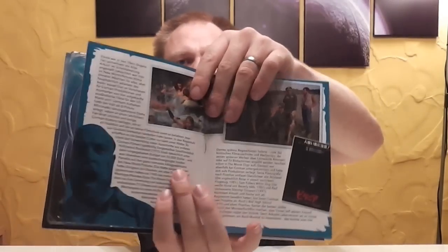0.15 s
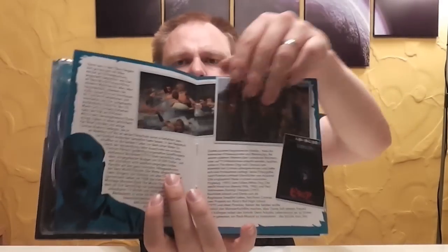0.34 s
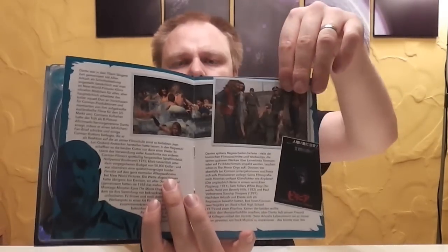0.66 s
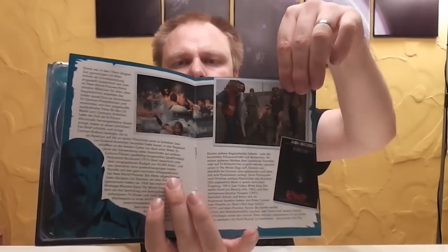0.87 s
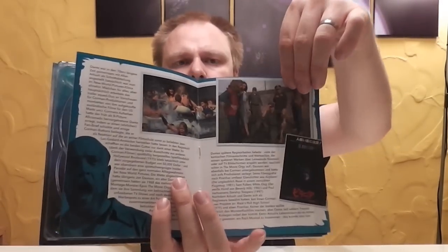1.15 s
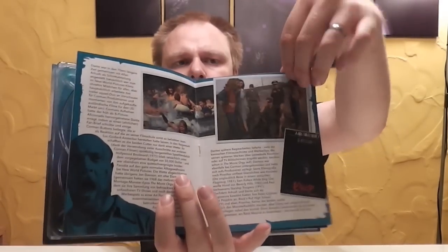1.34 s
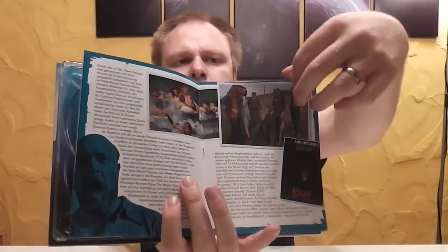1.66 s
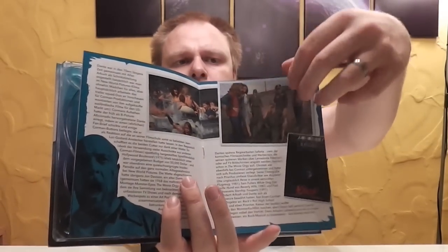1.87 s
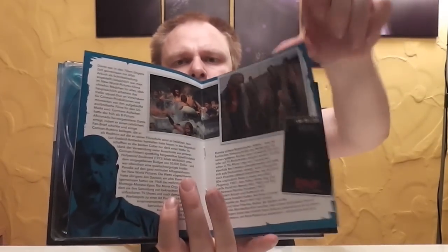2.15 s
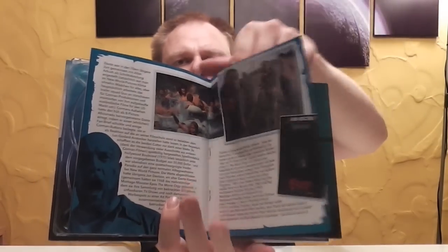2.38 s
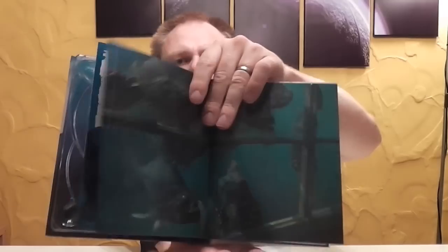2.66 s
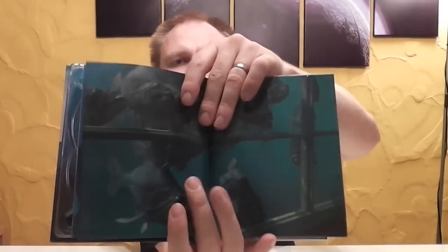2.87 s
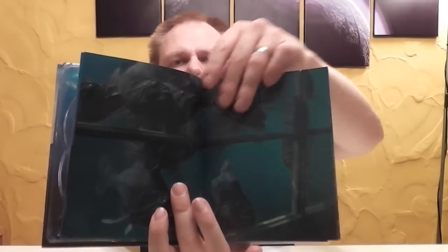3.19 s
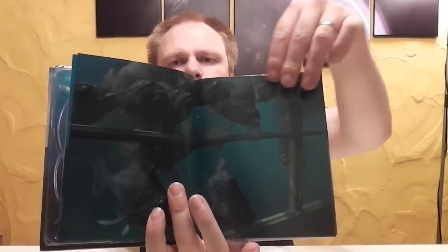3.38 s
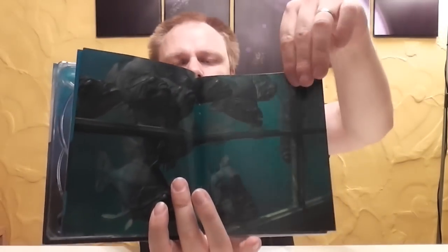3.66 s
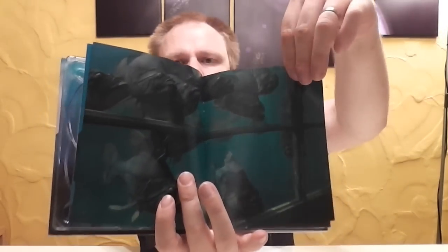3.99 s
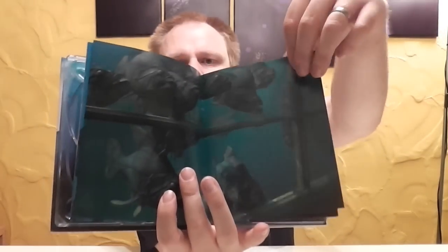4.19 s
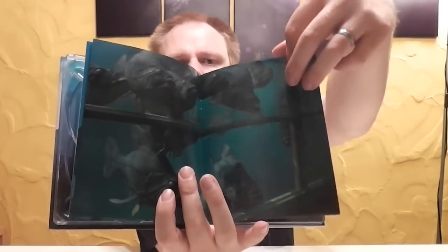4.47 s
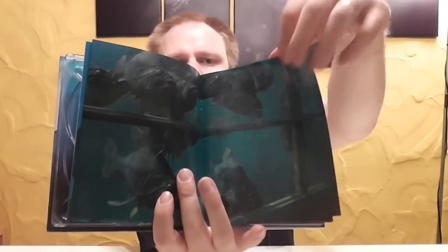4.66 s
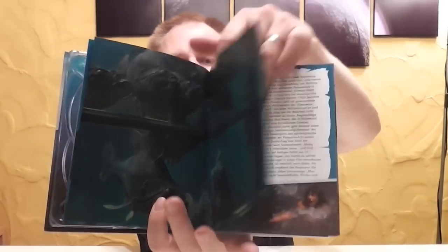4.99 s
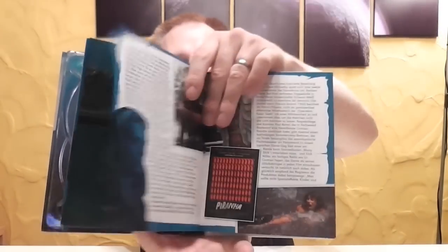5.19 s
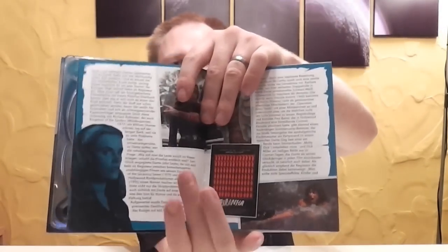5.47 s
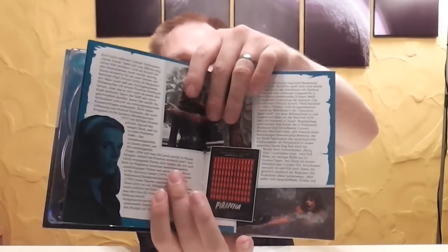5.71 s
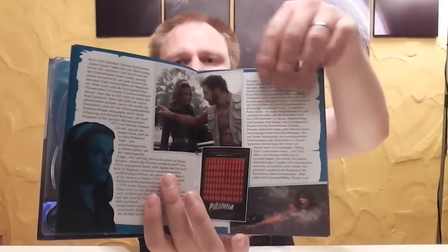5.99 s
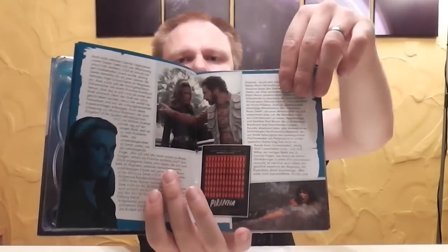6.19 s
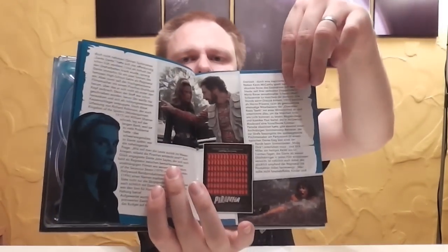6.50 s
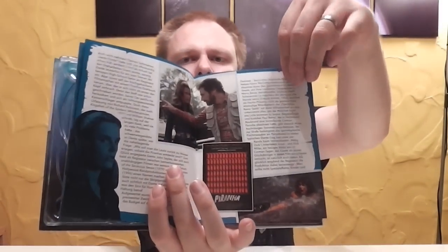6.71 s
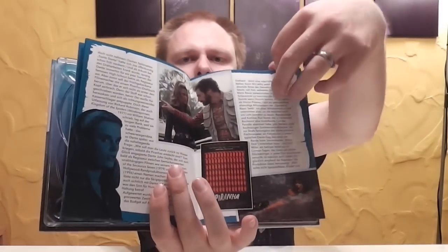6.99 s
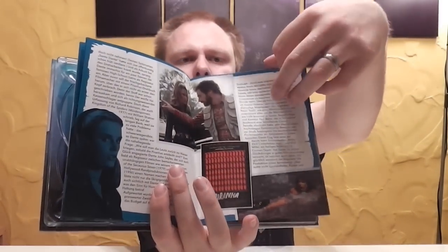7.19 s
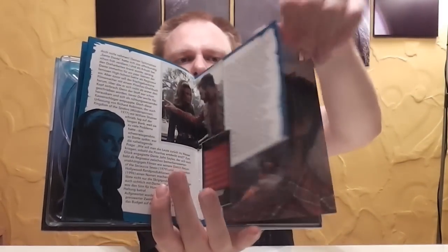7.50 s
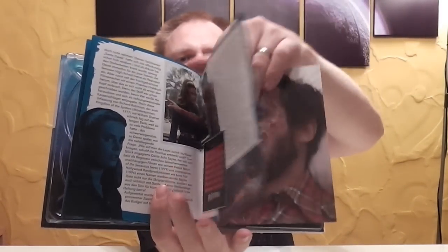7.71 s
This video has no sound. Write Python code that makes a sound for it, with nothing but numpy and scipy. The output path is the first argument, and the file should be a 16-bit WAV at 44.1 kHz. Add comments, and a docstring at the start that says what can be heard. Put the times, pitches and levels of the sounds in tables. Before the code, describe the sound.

Someone thumbs and turns heavy book pages right by the microphone. Edges slip off the fingertip with crisp little cracks, sheets flex and buckle with soft knocks, and whole pages swing over with a low, faint flutter. Activity comes in bursts with near-quiet between them, the strongest crack arriving late. The small room adds a short, faint tail, with gentle hiss and a low electrical hum throughout.

```python
"""Stiff glossy pages of a thick book are thumbed and turned close to a small stereo microphone.
A few light snaps come first, then short slides of finger and sheet and a run of sharp snaps near 1.4 s.
A page sweeps over from 2 s, with dull knocks and a faint creak; quiet rubbing and a second creak follow.
A quick run of snaps comes at 4.3 s as another page sweeps, one more sweeps at 5 s, and the hardest snap
comes near 7 s among knocks. A small quiet room, hiss and mains hum lie under all of it."""
import sys
import numpy as np
from scipy import signal
from scipy.fft import rfft, irfft
from scipy.io import wavfile
from scipy.ndimage import uniform_filter1d

SR = 44100
rng = np.random.default_rng(int(sys.argv[2]) if len(sys.argv) > 2 else 0)


def volts_from_db(level):
    """Convert decibel levels to linear amplitude ratios."""
    exponent = np.asarray(level, float) / 20
    return 10 ** exponent


def wav_out(sig):
    """Save sig, one row per channel (or a flat mono array), as 16-bit PCM at SR to the path in sys.argv[1]."""
    wavfile.write(sys.argv[1], SR, np.round(np.clip(np.atleast_2d(sig).T, -1, 1) * 32767).astype(np.int16))


N = 346185  # length of the scene in samples

# Levels of sheet, scrape and crack sounds are those before they are placed left or right. Page edges letting
# go, plus a few small buckles near 0.27, 0.42 and 3.17 s that pop with a crack: (time [s], crack peak [dB],
# thump rms over 3 ms [dB], pitch of the freed flap [Hz])
EDGE_SNAPS = [(0.1087, -39.5, -57, 1110), (0.265, -47, -47.5, 910), (0.3181, -39, -44.5, 1000),
              (0.4199, -49, -45.5, 1280), (1.098, -26, -37, 1700), (1.407, -18, -31.5, 1770),
              (1.4349, -21.5, -33, 1370), (1.4617, -25, -39, 1480), (1.48, -36, -45, 1970),
              (1.4993, -29.5, -48, 2100), (1.7946, -29.5, -44, 1380), (1.945, -26.5, -52, 3900),
              (1.955, -18, -35.5, 3400), (2.4985, -34.5, -49, 1570), (2.66, -41, -44.5, 1620),
              (2.9715, -47, -48, 1000), (3.169, -53, -48, 1560), (4.2518, -27.5, -37.5, 1340),
              (4.2591, -19, -39, 1870), (4.2817, -22.5, -48, 1560), (4.3009, -31.5, -36.5, 1380),
              (4.3214, -23, -42.5, 1350), (4.3418, -25.5, -39, 1820), (4.3633, -25.5, -39.5, 1820),
              (4.777, -30, -32.5, 1410), (5.1111, -33, -48.5, 970), (5.7228, -35.5, -44.5, 1490),
              (6.775, -23.5, -37.5, 940), (6.9667, -17, -26.5, 1900), (7.052, -40, -41, 1400),
              (7.0941, -21.5, -37, 1420), (7.205, -31, -39.5, 1880), (7.4299, -34, -43.5, 980),
              (7.8162, -36, -45.5, 1450)]
# Dull knocks of a buckling sheet: (time [s], rms over 3 ms [dB])
BUCKLE_KNOCKS = [(0.329, -56), (0.974, -54.5), (2.137, -49), (2.521, -46), (2.532, -42), (2.677, -40),
                 (2.701, -51), (2.7285, -44), (2.7342, -35.5), (3.083, -52.5), (3.23, -51.5), (5.259, -55),
                 (5.3546, -41), (5.408, -52.5), (5.8435, -50.5), (6.165, -50), (6.599, -46), (6.973, -36),
                 (6.9765, -33.5), (6.9885, -29)]
# Colour of the flexing sheet: (frequency [Hz], relative level [dB])
SHEET_COLOUR = [(100, -34), (500, -6), (950, 1), (1400, 6), (2000, 0.5), (2900, -10.5), (5000, -30)]
# Colour of scrapes and cracks as the microphone picks them up: (frequency [Hz], relative level [dB])
SCRAPE_COLOUR = [(1100, -29.5), (2200, 0.5), (3150, -4.5), (3800, 0), (4800, 0.5), (5800, -1.5),
                 (6900, 0.5), (9800, -4.5), (14000, -9.5), (16500, -31)]
# Colour of a whole page wobbling: (frequency [Hz], relative level [dB])
WOBBLE_COLOUR = [(50, -25), (300, -11), (1200, -36.5)]
# The sheet's resonance, which moves with its bend: (time [s], frequency [Hz])
SHEET_RESONANCE = [(1.3, 1390), (2.55, 1010), (2.72, 1440), (3.82, 1160), (4.2, 1550), (5.17, 820),
                   (5.35, 1160), (7.0, 1300)]


def evened(x):
    """Scales a sound to rms 1."""
    return x / np.sqrt(np.mean(x ** 2) + 1e-20)


def read(points, hz):
    """Reads a table of values on a log-frequency axis."""
    f, value = np.transpose(points)
    return np.interp(np.log(hz + 1), np.log(f + 1), value)


def curve(points):
    """Draws a table of (time, value) as one value per sample."""
    return np.interp(np.arange(N) / SR, *np.transpose(points))


def ring(points):
    """The answer to a single tap: energy 1, the given colour, and as prompt as that colour allows."""
    level_db = np.maximum(read(points, abs(np.fft.fftfreq(4096, 1 / SR))), -70)
    # the Hilbert transform finds the phase that lets nothing sound before the tap
    spectrum = np.exp(np.conj(signal.hilbert(np.log(volts_from_db(level_db)))))
    taps = np.fft.ifft(spectrum).real[:1024]
    return taps / np.linalg.norm(taps)


def add(mix, s, sound):
    """Mixes a sound in at time s, in seconds."""
    part = mix[round(s * SR):][:len(sound)]
    part += sound[:len(part)]


def fading_power(start, end, first_db, last_db, db_per_s):
    """Power that starts at once, glides from first to last level and then dies away."""
    t = np.arange(round((end - start + .3) * SR)) / SR
    glide_db = np.interp(t, [0, end - start], [first_db, last_db])
    fall_db = db_per_s * np.maximum(t - end + start, 0)
    return volts_from_db(glide_db - fall_db) ** 2


def slips(per_s, spread_db, smooth):
    """Stick-slip friction: tiny releases of uneven size over a smooth rub."""
    happens = rng.random(N) < per_s / SR
    size = volts_from_db(spread_db * np.minimum(rng.exponential(1, N), 5)) * happens
    return evened(size * rng.standard_normal(N)) + smooth * rng.standard_normal(N)


def patchy(x, patchy_db):
    """The colour wanders in patches of time and pitch as the sheet bends and the grip shifts."""
    z = signal.stft(x, nperseg=256)[2]
    patches = rng.standard_normal(z.shape[::-1])
    patches = uniform_filter1d(patches, size=24, axis=0)  # over time
    patches = uniform_filter1d(patches, size=3, axis=1)  # over frequency
    return signal.istft(z * volts_from_db(patchy_db * evened(patches).T), nperseg=256)[1][:N]


def resonate(x, hz, width_hz):
    """A resonance of gain 1 that follows the curve hz."""
    turn = np.exp(2j * np.pi * np.cumsum(hz) / SR)
    r = np.exp(-np.pi * width_hz / SR)
    # shift the moving pitch to zero, smooth, shift back
    return 2 * (turn * signal.lfilter([1 - r], [1, -r], x / turn)).real


def background():
    """Unrelated hiss in each microphone capsule and a mains hum shared by both."""
    # Hiss colour: (frequency [Hz], relative level [dB])
    hiss_colour = [(30, -22), (60, -8.5), (190, -4.5), (700, -5), (1300, -3.5), (2600, -12.5),
                   (5300, -11.5), (16000, -14.5)]
    # Mains hum: (frequency [Hz], rms level [dB])
    hum_tones = [(50, -87), (100, -92.5)]
    hiss_db = -63  # rms
    colour = volts_from_db(read(hiss_colour, np.fft.rfftfreq(N, 1 / SR)))
    hiss = irfft(rfft(rng.standard_normal((2, N))) * colour, N)
    t = np.arange(N) / SR
    hum = sum(np.sqrt(2) * volts_from_db(db) * np.sin(2 * np.pi * f * t) for f, db in hum_tones)
    return volts_from_db(hiss_db) * evened(hiss) + hum


def creaks():
    """The binding creaks faintly: thin gliding tones that swell and fade."""
    # Creaks: (start [s], end [s], first pitch [Hz], last pitch [Hz], peak level [dB])
    glides = [(2.43, 2.612, 273, 323, -66.5), (3.474, 3.675, 676, 648, -68.5)]
    out = np.zeros(N)
    for start, end, first_hz, last_hz, db in glides:
        hz = np.linspace(first_hz, last_hz, round((end - start) * SR))
        tone = np.sin(2 * np.pi * np.cumsum(hz) / SR)
        add(out, start, volts_from_db(db) * np.hanning(len(hz)) * tone)
    return out


def sweeps():
    """A whole page sweeps through the air and wobbles: low lumpy noise that swells and fades."""
    # Sweeps: (start [s], end [s], level at the middle [dB])
    swings = [(2.047, 2.9, -70.5), (3.962, 4.626, -69.5), (5.004, 5.488, -68.5)]
    gain = np.zeros(N)
    for start, end, db in swings:
        first, last = round(start * SR), round(end * SR)
        gain[first:last] = volts_from_db(db) * np.hanning(last - first)
    lumps = slips(530, spread_db=6.5, smooth=0.51)
    return gain * evened(signal.oaconvolve(lumps, ring(WOBBLE_COLOUR))[:N])


def flexes(per_s, spread_db, cycles):
    """The sheet buckles in soft-edged wavelets of a few cycles, each patch at its own pitch."""
    out, pitches = np.zeros(N), np.geomspace(250, 2800, 24)
    patch = rng.integers(0, len(pitches), N)
    happens = rng.random(N) < per_s / SR
    size = volts_from_db(spread_db * np.minimum(rng.exponential(1, N), 4)) * happens
    for k, hz in enumerate(pitches):
        t = np.arange(0, cycles / hz, 1 / SR)
        wavelet = np.sin(np.pi * t / t[-1]) ** 2 * np.sin(2 * np.pi * hz * t)
        out += volts_from_db(read(SHEET_COLOUR, hz)) * signal.oaconvolve(size * (patch == k), wavelet)[:N]
    return evened(out)


def stroke_gain():
    """Gains of flex and scrape: hold, slides and settling after snaps and knocks add in power."""
    # Slides of finger or sheet: (start [s], end [s], scrape level at the middle [dB],
    # sheet flex level at the middle [dB], swell from start to end [dB])
    strokes = [(0.72, 0.736, -64, -71, 3), (0.957, 1.015, -57.5, -63, 14), (1.195, 1.227, -46, -55, 16),
               (1.215, 1.263, -41, -54.5, -6), (1.298, 1.329, -40.5, -49, -16),
               (1.333, 1.372, -45.5, -49, -8), (1.44, 1.528, -56, -56, -3), (1.611, 1.616, -45.5, -53, -18),
               (1.658, 1.667, -53.5, -59, 8), (1.733, 1.732, -45, -56, -5), (1.807, 1.833, -50, -64, -8),
               (1.937, 1.944, -50, -62, 16), (2.123, 2.142, -52.5, -53, 16.5),
               (2.14, 2.315, -59.5, -67.5, -2), (2.516, 2.567, -56.5, -50.5, 1),
               (2.665, 2.765, -56, -48.5, -1), (2.98, 3.02, -57.5, -61.5, -12),
               (3.145, 3.225, -66.5, -62, -10), (3.22, 3.366, -59.5, -72, 2),
               (3.498, 3.609, -67.5, -73, 11), (3.789, 3.855, -58.5, -56.5, 8.5),
               (3.95, 3.967, -43.5, -48, -5), (3.991, 4.023, -49, -54.5, -19),
               (4.033, 4.21, -53.5, -54.5, -10), (4.131, 4.2, -52.5, -49.5, 7),
               (4.236, 4.418, -59.5, -54, -23), (4.407, 4.502, -64.5, -55, -39),
               (4.543, 4.591, -54.5, -53, -27.5), (4.771, 4.817, -49.5, -65, 5),
               (5.011, 5.009, -46.5, -79, 10.5), (5.11, 5.199, -58, -56.5, 10.5),
               (5.19, 5.339, -56, -62, 2), (5.309, 5.324, -49.5, -51.5, -8), (5.341, 5.365, -59, -48.5, -4),
               (5.738, 5.966, -63.5, -71, 0), (6.068, 6.193, -68, -88, 10), (6.207, 6.254, -53.5, -60, -4),
               (6.357, 6.473, -62.5, -71, 9), (6.473, 6.566, -62.5, -63, -17),
               (6.565, 6.596, -58.5, -61, 20), (6.604, 6.758, -43.5, -56, 0), (6.75, 6.857, -57, -54.5, 0),
               (6.958, 6.954, -47, -44, 16), (7.061, 7.098, -49, -51, -23), (7.087, 7.182, -55, -53.5, -24),
               (7.169, 7.219, -47.5, -55, 15.5), (7.444, 7.498, -49, -52, -8), (7.631, 7.628, -60, -67, 34)]
    # The book shifts faintly in the hands throughout: (time [s], scrape level [dB], sheet flex level [dB])
    hold = [(0.0, -74.5, -64), (0.96, -85, -77.5), (1.73, -67.5, -70.5), (2.5, -88, -81),
            (2.59, -64.5, -62), (3.5, -85, -75.5), (3.85, -65, -66), (4.24, -61.5, -81), (4.61, -67.5, -74),
            (5.71, -74, -63), (5.97, -77, -90), (6.47, -71, -78), (6.93, -67, -55.5), (7.06, -59, -70),
            (7.26, -66.5, -68.5), (7.85, -86, -84)]
    flex_swell = 0.34  # share of the swell that the sheet follows
    scrape_stop, flex_stop = 1502, 456  # fall after the finger stops, dB per s
    settle_db, settle_fall = -14, 281  # flexing on after a thump: level against it, fall in dB per s
    s, *held = np.transpose(hold)
    scrape, flex = (volts_from_db(np.interp(np.arange(N) / SR, s, db)) ** 2 for db in held)
    for start, end, scrape_db, flex_db, swell in strokes:
        half = swell / 2
        add(scrape, start, fading_power(start, end, scrape_db - half, scrape_db + half, scrape_stop))
        half = flex_swell * swell / 2
        add(flex, start, fading_power(start, end, flex_db - half, flex_db + half, flex_stop))
    thumps = [(s, db) for s, _, db, _ in EDGE_SNAPS] + BUCKLE_KNOCKS
    for s, thump_db in thumps:
        first_db = thump_db + settle_db
        add(flex, s, fading_power(s, s, first_db, first_db, settle_fall))
    return uniform_filter1d(np.sqrt([flex, scrape]), size=120, axis=1)


def slides():
    """Dense slips make the scrape, while the sheet rubs smoothly and buckles in small wavelets."""
    # Level of the scrape's top treble: (time [s], lift [dB])
    treble_lift = [(.4, 10), (1.25, -9.5), (1.9, -2.5), (3.3, -1), (3.6, 5), (4.1, -3), (5.2, -2),
                   (5.93, 3), (6.23, -17), (6.65, -12.5), (6.83, 6), (7.1, -12), (7.5, -6)]
    rub_width_hz, rub_db = 570, 1.5  # a rubbed sheet favours one resonance
    catches = 0.1 * slips(48, spread_db=1.5, smooth=0)  # page edges catching
    grip = evened(slips(5000, spread_db=2.0, smooth=1.0)) + catches
    scrape = signal.oaconvolve(grip, ring(SCRAPE_COLOUR))[:N]
    scrape = evened(patchy(scrape, patchy_db=3.6))
    top = signal.sosfiltfilt(signal.butter(2, 7500, "high", fs=SR, output="sos"), scrape)
    scrape = scrape + top * (volts_from_db(curve(treble_lift)) - 1)
    rub = signal.oaconvolve(rng.standard_normal(N), ring(SHEET_COLOUR))[:N]
    flex = 0.5 * patchy(rub, patchy_db=7.5) + flexes(1500, spread_db=2.5, cycles=7.36)
    flex = flex + volts_from_db(rub_db) * resonate(flex, curve(SHEET_RESONANCE), rub_width_hz)
    return stroke_gain() * np.array([evened(flex), scrape])


def knocks():
    """A buckle pops through the sheet: a few cycles that swell fast and ring out, with an overtone."""
    pitch_spread = 0.086  # scatter about the sheet's resonance, as a share of the pitch
    knock_ms = 0.7  # time constant of swell and decay
    out, ms = np.zeros(N), np.arange(800) / SR * 1000
    shape = (ms / knock_ms) ** 2 * np.exp(-ms / knock_ms)
    draws = rng.standard_normal((len(BUCKLE_KNOCKS), 2))
    for (s, db), (detune, phase) in zip(BUCKLE_KNOCKS, draws):
        hz = np.interp(s, *np.transpose(SHEET_RESONANCE)) * np.exp(pitch_spread * detune)
        cycles = hz * ms / 1000
        overtone = 0.3 * np.sin(3.1 * np.pi * cycles - phase)
        pop = shape * (np.sin(2 * np.pi * cycles + phase) + overtone)
        add(out, s - knock_ms / 1000, volts_from_db(db) * pop / np.std(pop[40:180]))
    return out


def snaps():
    """A burst swells as the edge bends, cracks, rings the freed flap and rattles to a stop."""
    # Light ticks of a nail or corner catching: (time [s], crack peak [dB])
    light_ticks = [(0.4723, -44.5), (1.06, -36), (1.0758, -41), (1.5177, -35), (1.525, -44), (1.5451, -34),
                   (1.651, -33), (1.7459, -35), (1.838, -36.5), (2.61, -38.5), (2.749, -34.5), (2.938, -38),
                   (3.05, -37.5), (4.021, -40), (4.6, -39), (4.768, -37), (5.1537, -37.5), (5.34, -32.5),
                   (5.362, -42), (5.699, -39.5), (5.734, -37.5), (5.7871, -34), (6.618, -36), (6.6313, -36),
                   (6.902, -43), (6.9117, -47), (6.923, -39.5), (6.934, -43), (7.016, -35), (7.1113, -38),
                   (7.1295, -30), (7.1416, -41), (7.176, -28), (7.3444, -46)]
    tick_thump_db, tick_hz = -17, 1760  # a tick's thump against its crack, and its flap pitch
    thud, crack_top_hz = 0.078, 10500  # share of low body under a thump; cracks dull above this
    lead = 400  # samples of bending kept ahead of each snap's time
    ms = np.arange(-lead, 1200) / SR * 1000 - .8
    out = np.zeros((2, N + 3000))
    rows = EDGE_SNAPS + [(s, db, db + tick_thump_db, tick_hz) for s, db in light_ticks]
    bursts = rng.standard_normal((len(rows), len(ms)))
    t = np.arange(1026) / SR
    low_body = signal.lfilter(*signal.butter(2, 120, "high", fs=SR), ring(WOBBLE_COLOUR))
    body = ring(SHEET_COLOUR) + thud * low_body
    crack_ring = ring(SCRAPE_COLOUR)
    dulling = signal.butter(1, crack_top_hz, fs=SR)
    for (s, crack_db, thump_db, hz), burst in zip(rows, bursts):
        swell_ms = 0.14 + 4.5 * volts_from_db(crack_db)  # a stronger edge bends longer
        rise = np.exp(-abs(ms) / swell_ms) + 0.16 * np.exp(-abs(ms) / 1.6)
        fall = np.exp(-abs(ms) / 0.64) + 0.2 * np.exp(-abs(ms) / 5.6)
        burst = np.where(ms < 0, rise, fall) * burst
        flap = t * np.exp(-np.pi * 600 * t) * np.sin(2 * np.pi * hz * t)
        flap = np.diff(flap, 2)  # a small flap sends out little bass
        thump = np.convolve(burst, body + 1.44 * flap / np.linalg.norm(flap))
        crack = signal.lfilter(*dulling, np.convolve(burst, crack_ring))
        add(out[0], s, volts_from_db(thump_db) * thump / np.std(thump[lead:lead + 140]))
        add(out[1], s, volts_from_db(crack_db) * crack / abs(crack).max())
    return out[:, lead:N + lead]


def room(x):
    """Sparse echoes of random sign, each band dying at its own speed, other echoes for each ear."""
    # Decay of the room: (frequency [Hz], time to fall by 60 dB [s])
    decay_times = [(3500, 0.26), (10000, 0.2)]
    taps = np.zeros((2, SR // 2))
    slots = np.arange(120, SR // 2 - 20, 20)  # one echo at a random place in every 20 samples
    at = slots + rng.integers(0, 20, (2, len(slots)))
    np.put_along_axis(taps, at, rng.choice([-1., 1.], at.shape), 1)
    hz, t, z = signal.stft(taps, SR, nperseg=256)
    decay = volts_from_db(-60 * t / read(decay_times, hz)[:, None])
    tail = signal.istft(z * decay, SR, nperseg=256)[1]
    return signal.fftconvolve(x[None], tail / np.linalg.norm(tail[0]), axes=1)[:, :N]


def scene():
    """The spine side of the book lies a little left, the page corner a little right."""
    sheet, scrape = slides() + snaps()  # the second row holds the cracks too
    sheet = sheet + knocks() + sweeps() + creaks()
    direct = sheet * volts_from_db([[1.1], [-1.1]]) + scrape * volts_from_db([[-.8], [.8]])  # dB left, right
    return direct + volts_from_db(-10.0) * room(sheet + scrape) + background()


def roll_off(x):
    """The treble ends steeply here."""
    return signal.sosfilt(signal.butter(12, 16660, fs=SR, output="sos"), x)


def record(dry):
    """Almost nothing is left above about 15.8 kHz."""
    edge_hz, edge_db = 15850, -24  # gain of what lies above the edge
    low = signal.oaconvolve(dry, signal.firwin(511, edge_hz, fs=SR)[None], "same")
    mix = low + volts_from_db(edge_db) * (dry - low)
    return roll_off(mix)


dry = scene()
out = record(dry)
wav_out(out)
```